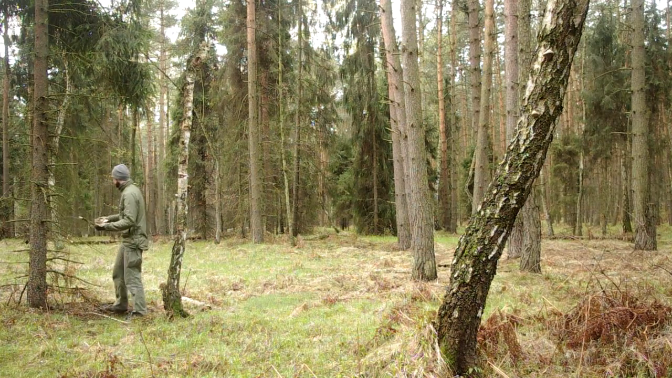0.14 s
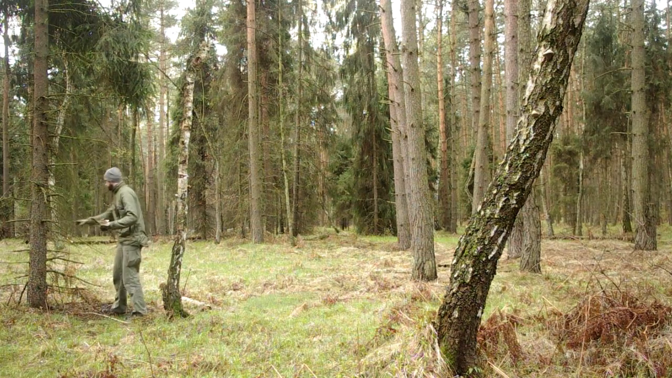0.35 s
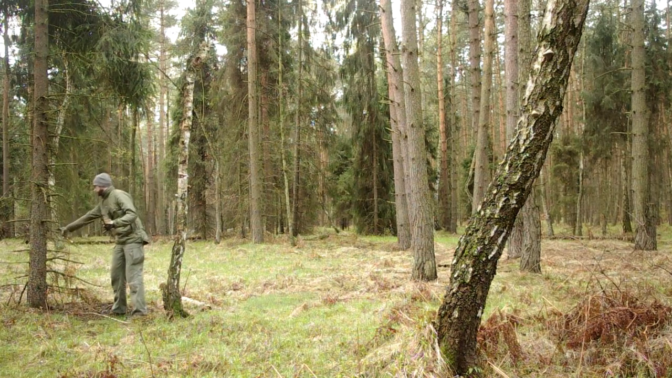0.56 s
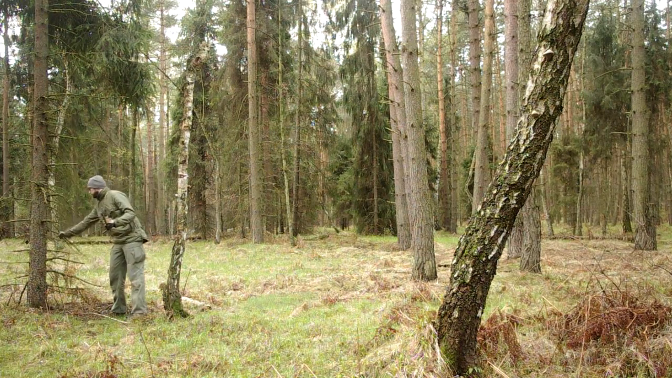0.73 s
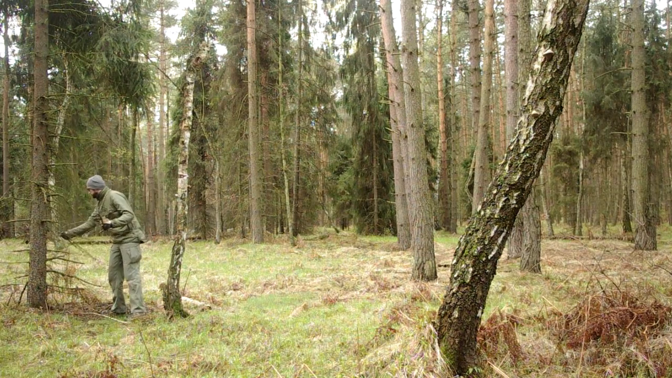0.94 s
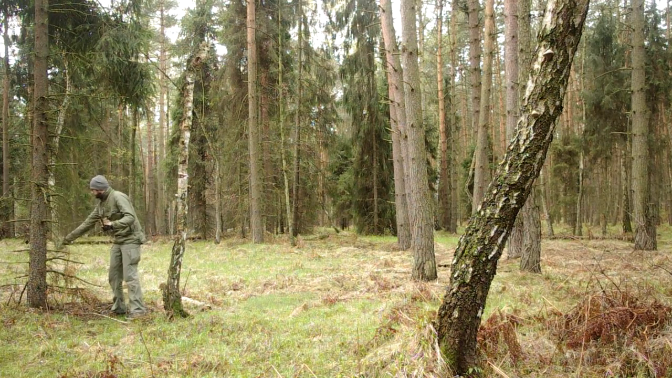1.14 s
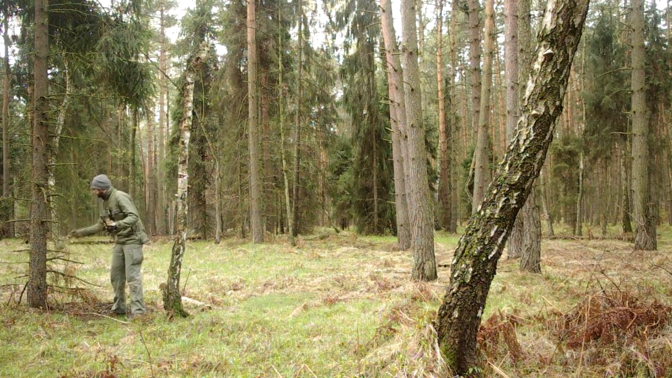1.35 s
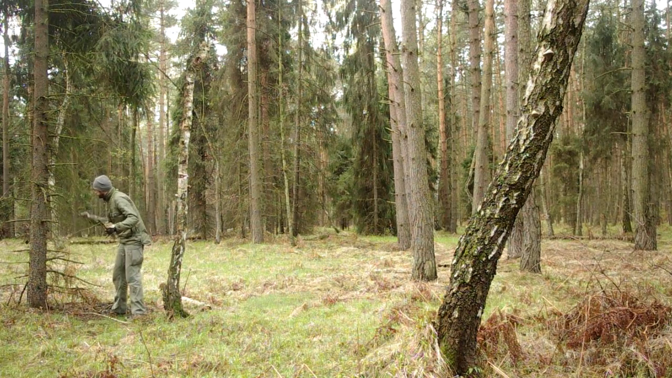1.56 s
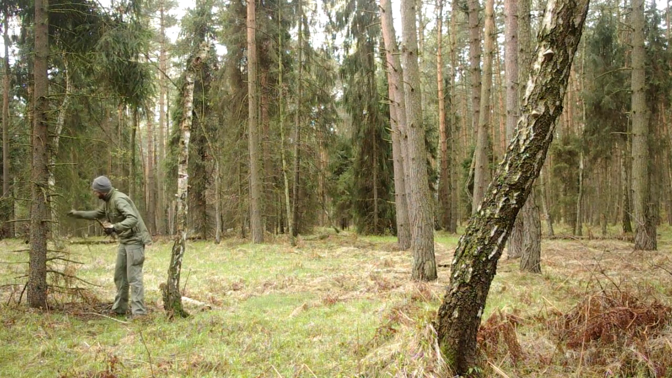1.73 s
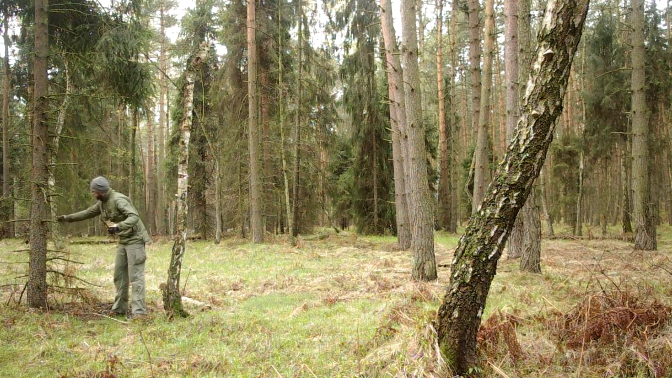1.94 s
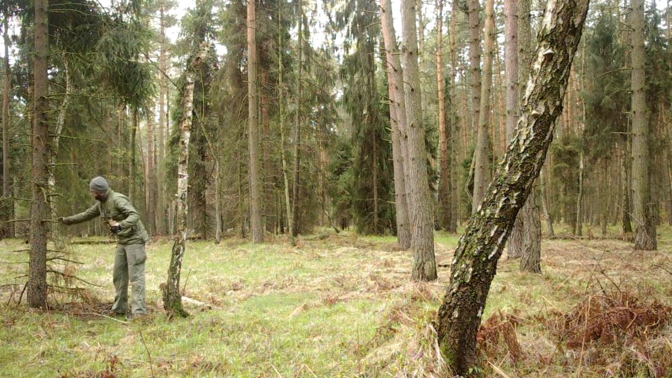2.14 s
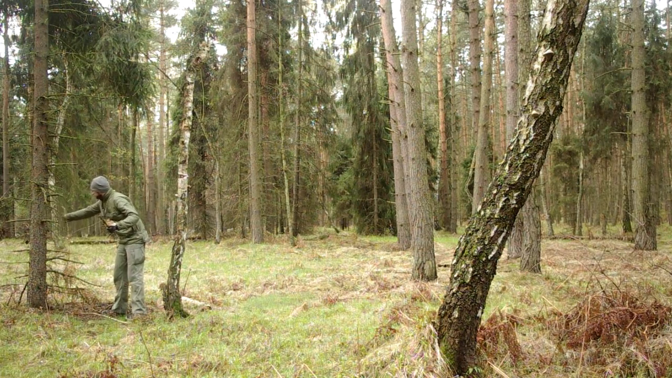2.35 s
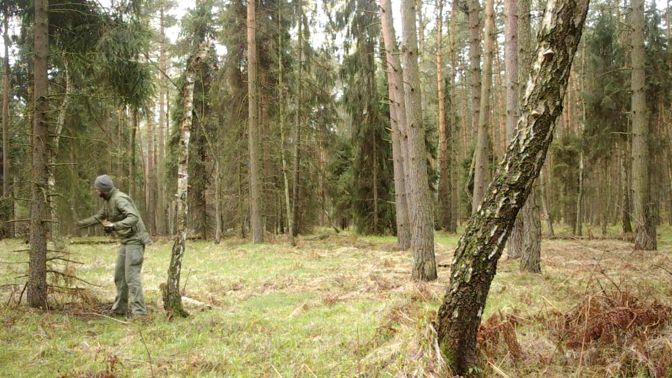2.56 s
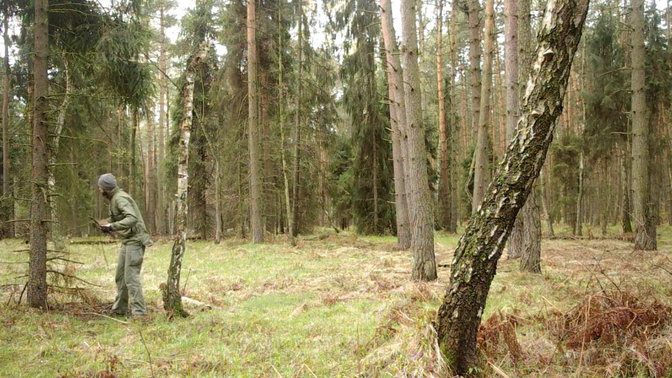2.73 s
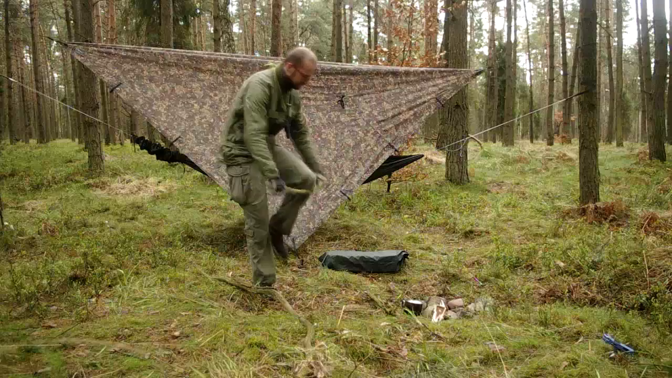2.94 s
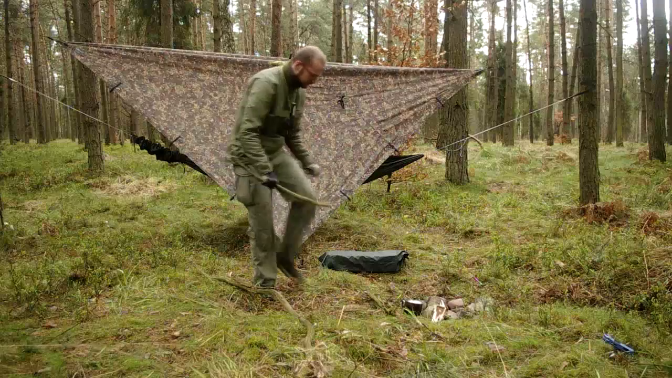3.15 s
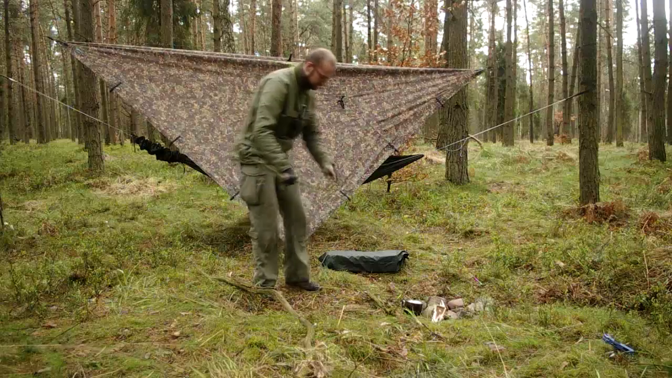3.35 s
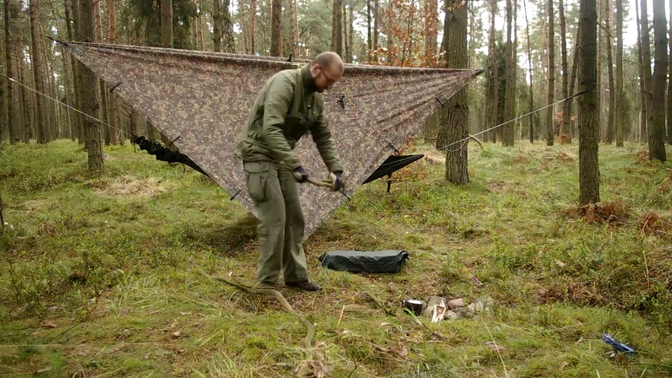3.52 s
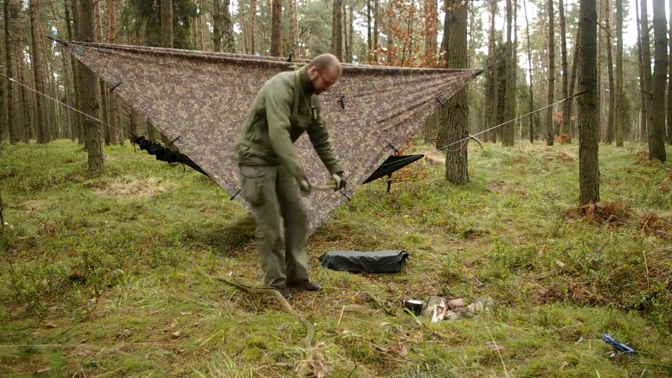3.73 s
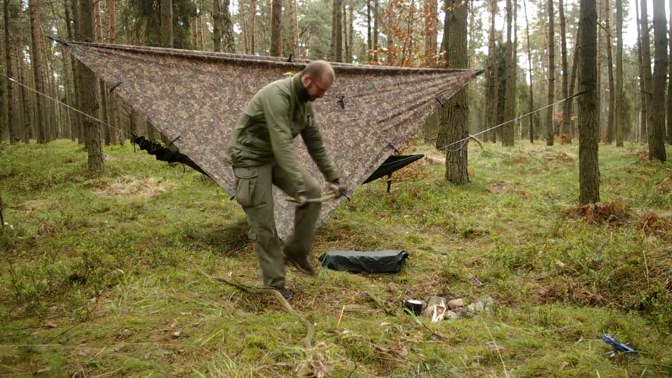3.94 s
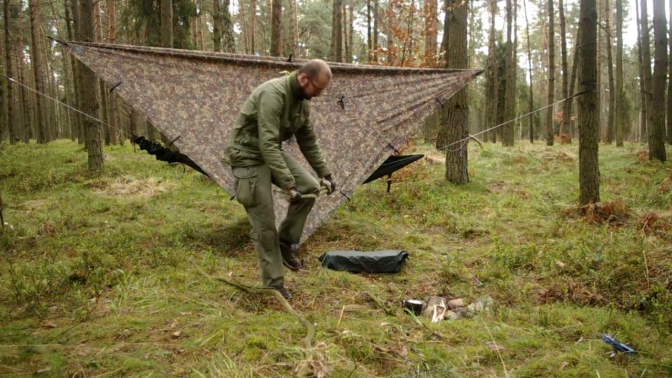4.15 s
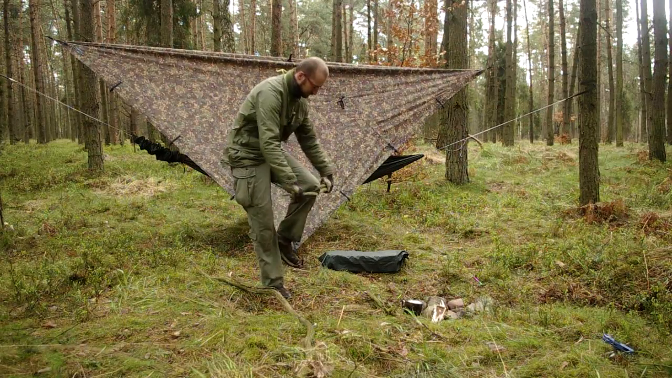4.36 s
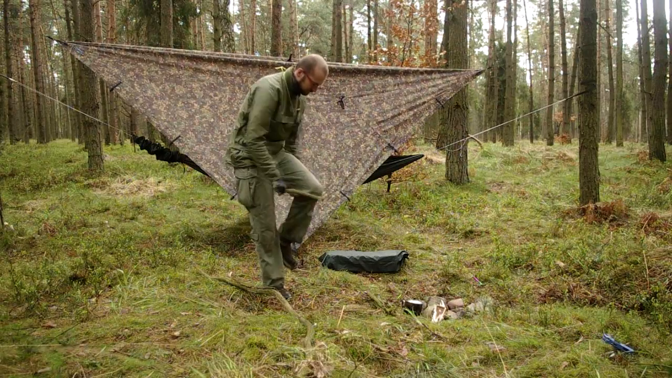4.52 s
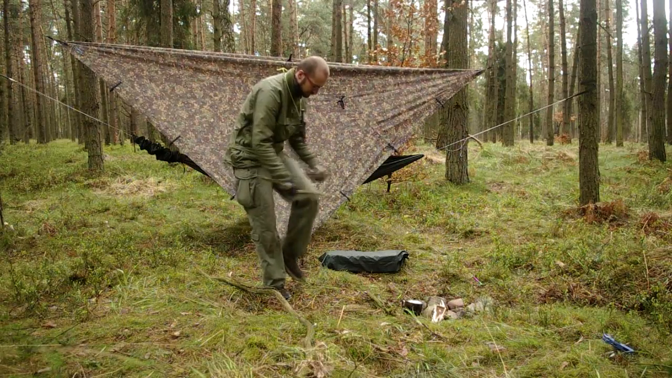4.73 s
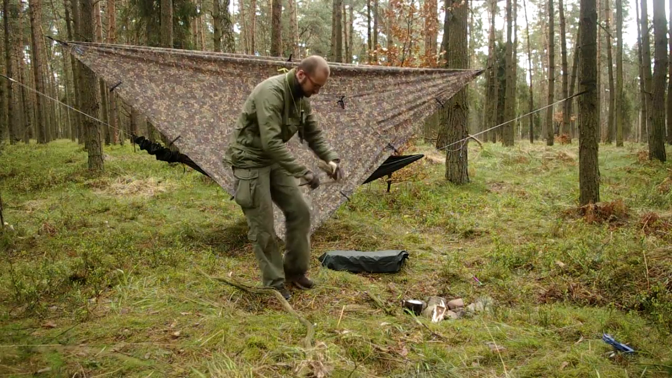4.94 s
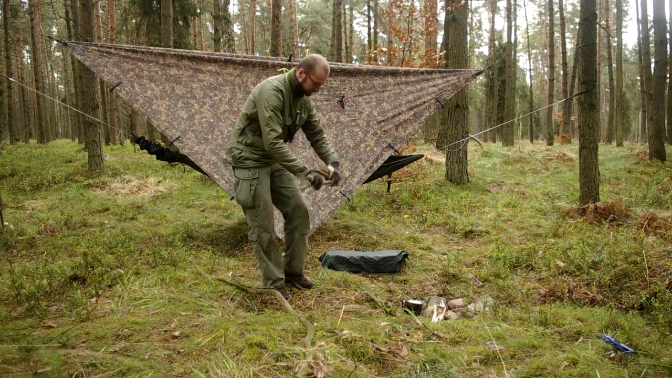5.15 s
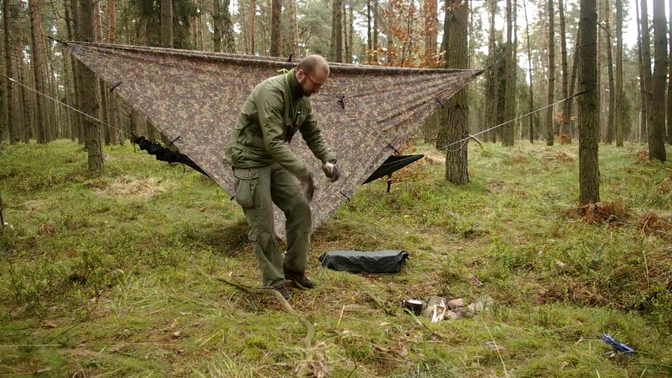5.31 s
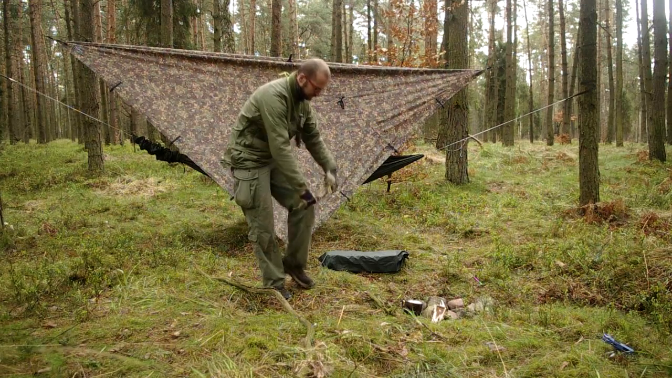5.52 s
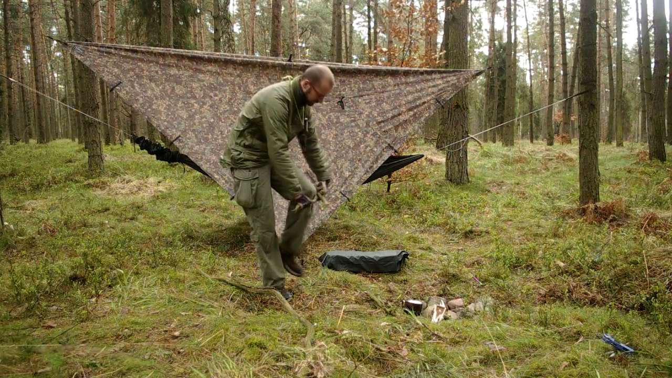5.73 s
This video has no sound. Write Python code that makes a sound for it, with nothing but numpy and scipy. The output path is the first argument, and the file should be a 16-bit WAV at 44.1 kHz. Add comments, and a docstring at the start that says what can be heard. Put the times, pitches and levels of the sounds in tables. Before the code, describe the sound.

Dry twigs snap sharply off a spruce amid thin birdsong, then thicker sticks crack loudly over a knee as a jacket swishes in the forest.

```python
"""Thin bird song opens the scene at a spruce, and dead twigs are soon snapped off amid rustles and faint ticks.
At 2.9 s the place becomes a camp, where dry sticks are broken over a knee, a jacket swishes and few birds sing.
Each crack is a fast-dying run of noise, filtered to ring like wood; its echoes are fading, clumpy noise.
Thuds, rustles and crackles are short bursts of filtered noise, and the birds are sliding sine whistles.
A soft noise murmur of the forest lies underneath; the loudest cracks overload the microphone."""
import sys
import numpy as np
from scipy import signal
from scipy.fft import rfft, irfft
from scipy.io import wavfile
from scipy.ndimage import uniform_filter1d

SR = 44100
rng = np.random.default_rng(int(sys.argv[2]) if len(sys.argv) > 2 else 0)


def to_wav(sig):
    """Store sig (one row per channel, or 1-D mono) as 16-bit WAV at the path in sys.argv[1].

    Samples outside -1..1 are clipped; the rate is SR.
    """
    pcm = np.clip(np.atleast_2d(sig), -1, 1) * 32767
    pcm = np.round(pcm).astype(np.int16)
    wavfile.write(sys.argv[1], SR, pcm.T)  # frames by channels


N = 259308  # length of the scene [samples]


def gain_of(db):
    """Turns decibels into a plain multiplier of the sound pressure."""
    return 10 ** (np.asarray(db) / 20)


def evened(x):
    """Scales a signal so that its average strength (rms) is 1."""
    return x / np.sqrt(np.mean(x ** 2) + 1e-20)


def read(points, hz):
    """Reads a curve between its points, with pitch spaced as the ear hears it (logarithmically)."""
    f, value = np.transpose(points)
    return np.interp(np.log(hz + 1), np.log(f + 1), value)


def add(mix, s, sound):
    """Mixes a sound in, starting at time s [s]."""
    part = mix[..., max(round(s * SR), 0):][..., :sound.shape[-1]]
    part += sound[..., :part.shape[-1]]


def coloured(x, gain):
    """Filters x with one gain per frequency so that the ringing comes only after each click."""
    size = x.shape[-1]
    # folding the cepstrum (the spectrum of the log gain) puts all the ringing after the click
    cepstrum = irfft(np.log(np.maximum(gain, 1e-5)), size)
    cepstrum[1:size // 2] *= 2
    cepstrum[size // 2 + 1:] = 0
    return irfft(rfft(x) * np.exp(rfft(cepstrum)), size)


def stereo_noise(colour, same, patchy_db):
    """Makes two-channel noise of a given colour, whose strength drifts in patches of time and pitch."""
    frames, hz = N // 512 + 5, np.fft.rfftfreq(2048, 1 / SR)
    a, b, c, d, patches = rng.standard_normal((5, frames, len(hz)))
    patches = uniform_filter1d(patches, size=6, axis=0)
    patches = evened(uniform_filter1d(patches, size=24, axis=1))
    same = np.clip(read(same, hz), -1, 1)
    left = a + 1j * b
    # the right channel shares part of the left one; the rest is its own noise
    right = same * left + np.sqrt(1 - same ** 2) * (c + 1j * d)
    spectrum = np.array([left, right]) * gain_of(read(colour, hz) + patchy_db * patches)
    noise = signal.istft(spectrum.transpose(0, 2, 1), nperseg=2048, noverlap=1536)[1]
    return evened(noise[:, :N])


def cracks(rows, colour, modes, splinter_db, splinter_s, bass_leak, apart, grain_db):
    """Fibres tear in a fast-dying run, then splinter faintly; gives direct sound and what the trees receive."""
    t, hz = np.arange(4096) / SR, np.fft.rfftfreq(4096, 1 / SR) + 1
    ringing_db = sum(db / (1 + (2 * (hz - f) / width) ** 2) for f, width, db in modes)
    ringing = gain_of(ringing_db)
    direct, spread = np.zeros((2, N)), np.zeros(N)
    for s, db, tear_ms, low_hz, tilt_db in rows:
        tear = tear_ms / 1000
        fibres, across, around, sizes = rng.standard_normal((4, len(t)))
        run = np.exp(-t / tear) + gain_of(splinter_db) * np.exp(-t / splinter_s)
        run = run * gain_of(grain_db * np.clip(sizes, -2, 2))
        # a thin piece radiates little below its lowest ringing pitch
        radiated = bass_leak + 1 / np.sqrt(1 + (low_hz / hz) ** 6)
        gain = gain_of(read(colour, hz) + tilt_db * np.log2(1 + hz / low_hz)) * radiated
        mid = coloured(fibres * run, gain * ringing)
        # the shortest waves reach the microphone's two ports differently
        side = coloured(across * run, gain * ringing * apart * (0.4 + hz / 9000))
        # all directions together: the resonances even out and nearby branches smear the crack
        outward = coloured(around * np.exp(-t / .015), gain)
        strength = gain_of(db) * np.sqrt(tear * SR)
        add(direct, s, strength * np.array([mid + side, mid - side]) / np.linalg.norm(mid))
        add(spread, s, strength * outward / np.linalg.norm(outward))
    return direct, spread


def twig_cracks():
    """Twigs snap off the spruce: wood resonances colour each crack, and the trunks send it back."""
    # snaps: (time [s], level over the tearing time [dB], tearing time [ms], lowest ringing pitch [Hz],
    # tilt [dB per octave well above that pitch])
    twigs = [(.4738, -39, 3.1, 3500, 6.5), (.8042, -25, 0.73, 4000, 0), (.8588, -21.5, 0.7, 3030, -2.5),
             (.9024, -21.5, 0.28, 5630, 0), (1.0104, -1.5, 0.71, 1150, -0.5), (1.06, -26.5, 0.47, 5000, 3),
             (1.154, 1.5, 1.25, 1880, -1.4), (1.4312, -31.5, .65, 4090, -6),
             (1.921, -29.5, 0.66, 4000, -8.5), (2.0693, -30, 0.55, 3870, -6), (2.282, -12, 0.47, 4500, 3),
             (2.3963, -22, 0.56, 6000, -1), (2.4156, -11.5, .7, 3700, -4), (2.421, -26.5, 0.96, 1480, -1.5),
             (2.4432, -36, 5.7, 1530, -8), (2.468, -25, 0.36, 3570, -2), (2.5087, -7, 0.48, 3930, -3.5),
             (2.5175, -18, 1.6, 2500, 2.5), (2.5576, -20, 0.36, 2830, 2), (2.5853, -27.5, 0.32, 3000, -9)]
    # colour of the fracture: (frequency [Hz], level [dB])
    twig_colour = [(100, 13), (600, 5), (1500, 2), (3000, -1.5), (5000, -0.5), (7500, -1), (11000, 1),
                   (16000, -6)]
    # resonances of the wood: (frequency [Hz], width [Hz], height above the colour [dB])
    twig_modes = [(1566, 240, 8.9), (2030, 170, 8), (2870, 183, 9.1), (3210, 130, 2.2), (4670, 1140, 5.6),
                  (5260, 180, 3.5), (8840, 840, 5.4), (11300, 970, 6.3)]
    direct, spread = cracks(twigs + strain_ticks(), twig_colour, twig_modes, splinter_db=-25.5,
                            splinter_s=0.01, bass_leak=0.067, apart=0.35, grain_db=2.5)
    echo_colour = [(300, 1), (2000, -4), (4500, -4.5), (9000, -4.0), (15000, 0.5)]  # (Hz, dB)
    echo = forest(spread, echo_colour, longer=1.0, build_s=0.004, lumpy_db=5.5)
    return direct + gain_of(-19.5) * echo


def stick_cracks():
    """Dry sticks break over a knee at the camp: the same tearing and echoes, with the sticks' own colour."""
    # breaks: (time [s], level over the tearing time [dB], tearing time [ms], lowest ringing pitch [Hz],
    # tilt [dB per octave well above that pitch])
    sticks = [(3.0846, 3, 3.66, 2700, -3), (3.0912, -4, 0.56, 1500, 6), (3.102, -18, 3.5, 2500, 7),
              (3.1226, -11.5, 2, 1300, -2.5), (3.4308, -34.5, 1.2, 1000, 3.5),
              (3.594, -40, 2.5, 3000, -6.5), (4.5528, -15, .78, 4000, -8), (4.5579, 4.5, 0.68, 3000, -0.5),
              (4.5683, -9, 1.4, 3000, 2.5), (4.5703, -1, 3.6, 1200, -0.5), (4.5804, -4, 3.2, 2600, 0),
              (4.5839, -4.5, 1, 2600, 1), (4.6468, -17, 0.48, 2000, 4), (4.6486, -9, 0.68, 900, -2),
              (5.005, -40.5, 2.5, 1900, -4), (5.459, -41.5, 4.7, 1590, -3)]
    # colour of the fracture: (frequency [Hz], level [dB])
    stick_colour = [(100, -6), (400, 3.5), (750, -0.5), (1500, -3.5), (3200, 2), (5500, -2), (8000, -3),
                    (12000, -2.5), (16000, -4.5)]
    # resonances of the wood: (frequency [Hz], width [Hz], height above the colour [dB])
    stick_modes = [(1070, 130, 1.2), (1770, 520, 5), (2830, 60, 1.9), (3165, 210, 1.4), (3903, 1100, 5.8),
                   (5110, 360, 2.1), (7640, 620, 5)]
    direct, spread = cracks(sticks, stick_colour, stick_modes, splinter_db=-25,
                            splinter_s=0.015, bass_leak=0.23, apart=0.19, grain_db=3)
    echo_colour = [(300, -3), (1200, 2.0), (4500, -3.5), (9000, -1), (15000, -3)]  # (Hz, dB)
    echo = forest(spread, echo_colour, longer=0.74, build_s=0.0052, lumpy_db=3.5)
    return direct + gain_of(-26) * echo


def strain_ticks():
    """Single fibres part at random moments while a branch is bent; gives rows like those of the twigs."""
    # spells of bending: (start [s], end [s])
    strains = [(.82, 1.04), (1.061, 1.28), (2.081, 2.24), (2.331, 2.42)]
    ticks_per_s, tick_ms, tilt_db = 20, 0.62, -6.5
    middle_db, spread_db, middle_hz = -38, 7, 4600
    rows = []
    for start, end in strains:
        count = round((end - start) * ticks_per_s)
        for when, size, pitch in rng.random((count, 3)):
            db = middle_db + spread_db * (2 * size - 1)
            hz = middle_hz * 2 ** (pitch - .5)  # up to half an octave either way
            rows.append((start + when * (end - start), db, tick_ms, hz, tilt_db))
    return rows


def stub():
    """The stub left on the trunk swings briefly in its bending mode: a low, fading sine."""
    start_s, pitch_hz, level_db = 1.0106, 285, -25.5
    t60 = .13  # time to fall by 60 dB [s]
    t, out = np.arange(SR // 4) / SR, np.zeros(N)
    twang = gain_of(level_db - 60 * t / t60) * np.sin(2 * np.pi * pitch_hz * t)
    add(out, start_s, twang)
    return out


def forest(x, colour, longer, build_s, lumpy_db):
    """Echoes from countless trunks: they build up, come in clumps, and each band dies at its own speed."""
    # ring time of the forest: (frequency [Hz], time to fall by 60 dB before "longer" stretches it [s])
    trunks = [(200, .4), (800, .55), (2000, 0.85), (5000, 0.97), (10000, 0.62), (16000, 0.33)]
    size = 3 * SR // 2
    both, apart, clumps = rng.standard_normal((3, size))
    clumps = gain_of(lumpy_db * evened(uniform_filter1d(clumps, size=90)))
    taps = np.array([both + .55 * apart, both - 0.76 * apart]) * clumps
    hz, t, z = signal.stft(taps, SR, nperseg=256)
    fall_db = 60 * t / (longer * read(trunks, hz)[:, None])
    z = z * gain_of(read(colour, hz)[:, None] - fall_db)
    build_up = 1 - np.exp(-np.arange(size) / SR / build_s)
    tail = signal.istft(z, SR, nperseg=256)[1][:, :size] * build_up
    return signal.fftconvolve(x[None], tail / np.linalg.norm(tail[0]), axes=1)[:, :N]


def thuds():
    """Boots and knee give soft, low pushes with no ring: fading noise with the treble removed."""
    # pushes: (time [s], level over the decay time [dB], decay to 37 % [s], upper edge [Hz])
    pushes = [(.496, -37.5, 0.019, 220), (2.973, -40.5, .05, 90), (3.061, -32, .0042, 331),
              (3.087, -30, 0.0083, 447), (3.429, -28.5, 0.018, 290), (4.645, -36.5, 0.033, 596)]
    t, out = np.arange(SR // 4) / SR, np.zeros(N)
    for s, db, decay, edge_hz in pushes:
        band = signal.butter(2, [edge_hz / 5, edge_hz], "band", fs=SR, output="sos")
        push = signal.sosfilt(band, rng.standard_normal(len(t)) * np.exp(-t / decay))
        add(out, s, gain_of(db) * push / np.sqrt(np.sum(push ** 2) / (decay * SR)))
    return out


def rustles_and_crackles(grain_db=5.0, apart=0.24):
    """Swells of countless tiny ticks of uneven size make both the rustling and the crackling."""
    # rustling and crackling: brushed needles and litter, and the crackly tails of snaps:
    # (time [s], length [s], level [dB], centre [Hz])
    crackles = [(.448, .1, -54, 7200), (0.783, 0.22, -55.5, 5540), (1.005, 0.038, -35.5, 4400),
                (1.172, 0.14, -45, 7000), (2.357, 0.11, -58, 7000), (2.522, 0.08, -50.5, 6130),
                (3.661, 0.05, -48, 2650), (4.41, 0.017, -50, 5950), (5.441, 0.049, -44, 1900)]
    left, right, sizes = rng.standard_normal((3, N))
    sizes = np.clip(evened(uniform_filter1d(sizes, size=40)), -2, 2)
    ticks = np.array([left + apart * right, left - apart * right]) * gain_of(grain_db * sizes)
    out = np.zeros((2, N))
    for s, length, db, hz in crackles:
        band = signal.butter(2, [hz / 2, min(hz * 2, SR / 2.2)], "band", fs=SR, output="sos")
        part = signal.sosfilt(band, ticks[:, round(s * SR):round((s + length) * SR)])
        add(out, s, gain_of(db) * evened(part * signal.windows.tukey(part.shape[1], .6)))
    return out


def bird(notes, scoop, bend, waver, flutter_db):
    """Unsteady sine whistles scoop up to pitch, then slide: early if bend is negative, late if positive."""
    out = np.zeros(N)
    wander = uniform_filter1d(rng.standard_normal((2, N)), size=200)
    drift, flutter = (evened(v) for v in uniform_filter1d(wander, size=200))
    for s, length, start_hz, end_hz, db in notes:
        u = np.linspace(0, 1, round(length * SR))  # progress through the note
        at = max(round(s * SR), 0) + np.arange(len(u))
        slide = np.expm1(bend * u) / np.expm1(bend)
        hz = start_hz + (end_hz - start_hz) * slide
        hz = hz * (1 - scoop * (1 - u) ** 4) * (1 + waver * drift[at])
        whistle = signal.windows.tukey(len(u), .4) * np.sin(2 * np.pi * np.cumsum(hz) / SR)
        add(out, s, gain_of(db + flutter_db * flutter[at]) * evened(whistle))
    return out


def tit_notes():
    """A thin, high phrase starts on level notes and ends in down-slurs; gives rows for bird()."""
    # phrase: (time [s], length [s], starting pitch [Hz])
    phrase = [(.005, 0.16, 6240), (0.2, 0.13, 6520), (.395, 0.082, 6580), (0.557, 0.047, 6400),
              (0.638, 0.066, 6150), (0.723, 0.073, 5860)]
    level_db = -55.5
    droop, droop_growth = 0.147, 2.33  # share by which the last note falls; power by which the fall grows
    notes = []
    for s, length, hz in phrase:
        fall = droop * (abs(s) / phrase[-1][0]) ** droop_growth
        notes.append((s, length, hz, hz * (1 - fall), level_db))
    return notes


def birds():
    """Three singers whistle; the farther each is, the more of its song arrives as echo."""
    # fluted notes that hold, then bend at the end:
    # (time [s], length [s], start pitch [Hz], end pitch [Hz], level before flutter [dB])
    fluted_notes = [(1.112, 0.031, 2130, 1984, -47), (1.28, .057, 1870, 1980, -50),
                    (1.325, 0.1, 2108, 2167, -44.5), (1.42, 0.047, 2116, 1960, -49),
                    (1.483, .044, 2597, 2270, -41), (1.75, 0.12, 2944, 2410, -52),
                    (1.855, 0.12, 1704, 1710, -54), (1.972, 0.062, 2217, 2120, -46),
                    (2.02, .075, 2082, 2044, -50.5)]
    # quick slurs that level out:
    # (time [s], length [s], start pitch [Hz], end pitch [Hz], level before flutter and mixing [dB])
    quick_slurs = [(1.11, 0.043, 5690, 4850, -47), (1.56, 0.12, 5300, 5650, -64.5),
                   (1.69, 0.062, 6480, 5190, -59.5), (1.85, .09, 6630, 4110, -52.5),
                   (2.05, .067, 6480, 5060, -61.5), (2.21, 0.11, 5390, 4080, -57.5),
                   (2.6, 0.098, 4080, 4040, -62), (2.68, .2, 4560, 4680, -65.5),
                   (2.75, .055, 6940, 5500, -70.5), (3.84, 0.04, 4400, 4200, -51),
                   (4.1, 0.055, 4164, 4260, -56)]
    tit = bird(tit_notes(), scoop=0.043, bend=2.4, waver=0.0033, flutter_db=3.0)
    blackbird = bird(fluted_notes, scoop=.05, bend=3.8, waver=0.0035, flutter_db=3.0)
    robin = bird(quick_slurs, scoop=0, bend=-4.0, waver=.008, flutter_db=4.5)
    scattered = gain_of(-2) * tit + gain_of(-1.5) * blackbird + gain_of(-1.5) * robin
    # the echo's colour points are (Hz, dB)
    echo = forest(scattered, [(1500, 0.074), (7000, 0.015)], longer=2.1, build_s=0.011, lumpy_db=-3.0)
    return tit + blackbird + gain_of(-3.5) * robin + gain_of(-4.5) * echo


def jacket(t):
    """Cloth rubs as noise: each arm movement is a bell-shaped swell over a faint steady rub."""
    # arm movements: (time of the peak [s], level [dB], half length [s])
    swishes = [(2.964, -49.5, 0.11), (3.44, -54, 0.065), (3.72, -50, 0.074), (3.818, -40.5, 0.038),
               (4.016, -48.5, .09), (4.28, -51.5, 0.092), (5.054, -53.5, 0.12), (5.418, -50.5, 0.039),
               (5.73, -53, 0.35)]
    # colour of the rubbing: (frequency [Hz], level [dB])
    cloth = [(300, -8), (1000, 1), (2000, 0.5), (4200, 1.5), (7000, -5.5), (12000, -3), (15500, -17)]
    rest_db = -59.5
    swells = sum(gain_of(db) ** 2 * np.exp(-((t - s) / half) ** 2) for s, db, half in swishes)
    loudness = np.sqrt(gain_of(rest_db) ** 2 + swells)
    # left-right likeness points: (Hz, 1 = the same)
    return loudness * stereo_noise(cloth, [(500, 1.0), (10000, 0.82)], patchy_db=1.5)


def background(t):
    """The forest murmurs as steady noise, coloured for each place; the jacket is heard only at the camp."""
    # colour of the murmur at the spruce: (frequency [Hz], level per Hz [dB])
    glade_colour = [(12, -48), (20, -18), (65, 3), (113, -5), (187, -1.5), (459, -13), (825, -22),
                    (1910, -21), (2530, -27), (5680, -28.5), (6180, -30), (6720, -33.5), (12400, -33.5),
                    (14300, -40.5), (16000, -65.5)]
    # colour of the murmur at the camp: (frequency [Hz], level per Hz [dB])
    camp_colour = [(12, -34), (20, -19.5), (50, 4), (74, 1.5), (198, -4), (328, -8), (422, -8), (660, -14),
                   (1810, -19.5), (2260, -27), (4940, -30), (7110, -45), (11800, -36), (13900, -42),
                   (16000, -86.5)]
    # left-right likeness: (frequency [Hz], likeness [1 = the same, 0 = unrelated])
    likeness = [(60, 0.43), (180, 0.66), (550, 0.528), (1650, 0.633), (4970, 0.59), (15000, 0.62)]
    camp_s, change_s = 2.938, 0.0026  # start and length of the move to the camp [s]
    at_camp = np.clip((t - camp_s) / change_s, 0, 1)
    glade = gain_of(-46.5) * stereo_noise(glade_colour, likeness, patchy_db=3.0)
    camp = gain_of(-42) * stereo_noise(camp_colour, likeness, patchy_db=1.23)
    camp = camp * gain_of([[1], [-1]])  # left 1 dB up, right 1 dB down
    return (1 - at_camp) * glade + at_camp * (camp + jacket(t))


def scene():
    """Adds up everything heard, first at the spruce and then at the camp."""
    t = np.arange(N) / SR
    breaking = twig_cracks() + stick_cracks() + stub()
    return breaking + thuds() + rustles_and_crackles() + birds() + background(t)


def record(dry):
    """The microphone overloads: the loudest cracks clip at full scale; then the highest treble is cut."""
    edge_hz = 16200
    clipped = np.clip(dry, -1, 1)
    low_pass = signal.firwin(255, edge_hz, window=("kaiser", 8), fs=SR)
    return signal.oaconvolve(clipped, low_pass[None], "same")


dry = scene()
out = record(dry)
to_wav(out)
```